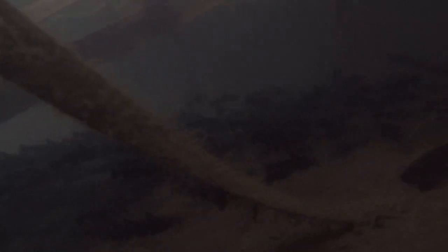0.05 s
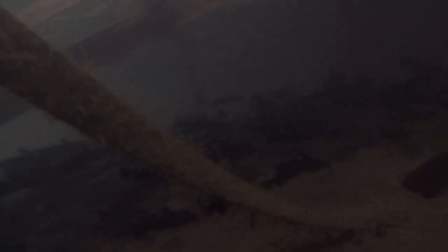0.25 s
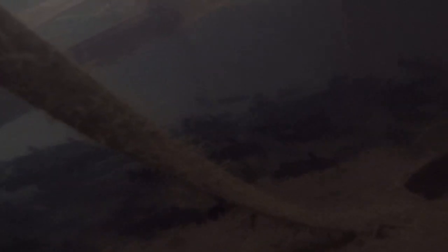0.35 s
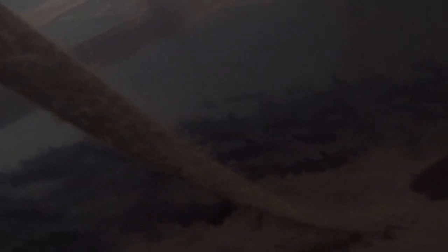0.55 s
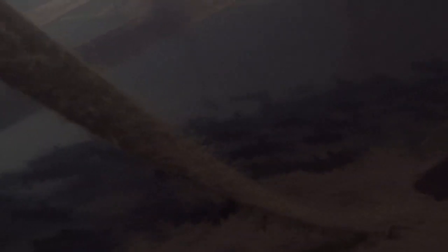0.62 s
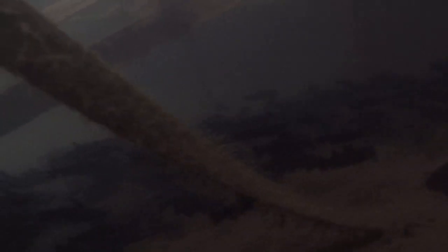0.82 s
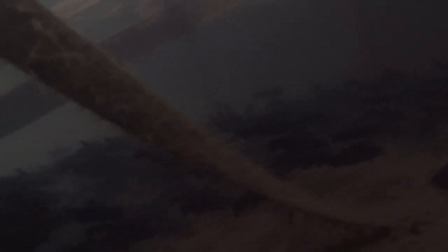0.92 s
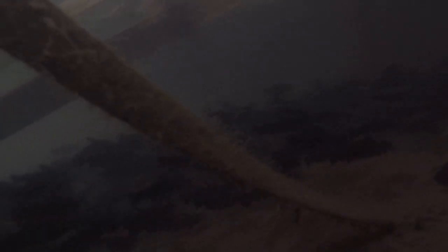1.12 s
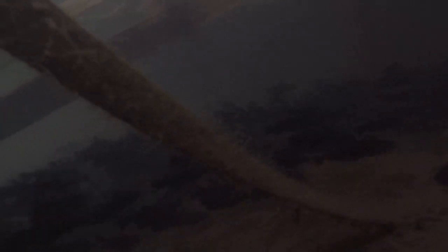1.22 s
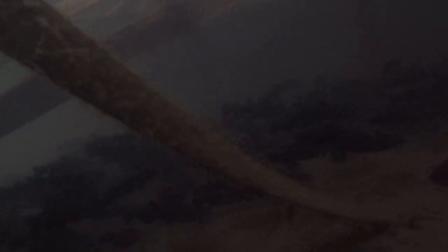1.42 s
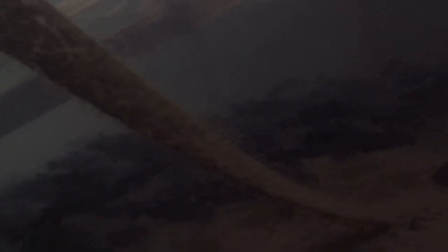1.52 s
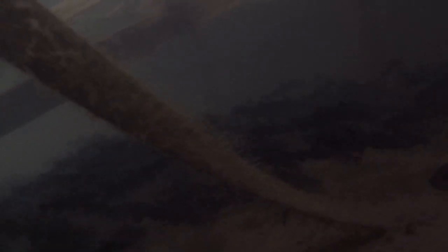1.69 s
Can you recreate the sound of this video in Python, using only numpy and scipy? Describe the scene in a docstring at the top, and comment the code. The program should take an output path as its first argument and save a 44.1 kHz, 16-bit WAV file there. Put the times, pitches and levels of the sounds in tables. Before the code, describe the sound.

Muffled knocks and soft bumps against a submerged camera, with water rumbling faintly underneath.

```python
"""Three knocks on a sealed camera housing in shallow water.
Each swells briefly, clacks in the housing's modes and leaves a low, water-damped ring.
Soft bumps and tiny scuffs come between. Under them: the rumble and wash of moving water,
a faint swish that rises in pitch, and microphone hiss."""
import sys
import numpy as np
from scipy import signal
from scipy.fft import rfft, irfft
from scipy.io import wavfile

SR = 44100
rng = np.random.default_rng(int(sys.argv[2]) if len(sys.argv) > 2 else 0)


def wrap_up_sound(samples):
    """Save the sound to the file named by the first command line argument, as 16-bit audio."""
    columns = np.atleast_2d(samples).T
    # keep every value between -1 and 1, then stretch to whole-number steps
    tamed = np.clip(columns, -1, 1)
    steps = np.round(tamed * 32767).astype(np.int16)
    wavfile.write(sys.argv[1], SR, steps)


N = 77175
T = np.arange(N) / SR
HZ = np.fft.rfftfreq(N, 1 / SR)

# water rumble and wash, envelopes (time [s], level [dB])
RUMBLE_LEVEL = [(0, -41), (.2, -39), (.45, -40.5), (.6, -38), (.8, -43.5), (.95, -36.5), (1.15, -38.5),
                (1.33, -35.5), (1.46, -35), (1.6, -32.5), (1.75, -33.5)]
WASH_LEVEL = [(0, -49), (.15, -48.5), (.27, -44.5), (.45, -46.5), (.65, -49), (.8, -49.5), (1.0, -50.5),
              (1.15, -46.5), (1.3, -49.5), (1.42, -48), (1.55, -48.5), (1.68, -49), (1.75, -46)]
# rumble, wash and microphone hiss, spectra (frequency [Hz], relative density [dB])
RUMBLE_SPECTRUM = [(10, -13.5), (30, 5.5), (60, -2), (100, -8), (150, -16.5), (220, -19), (400, -55),
                   (1000, -77)]
WASH_SPECTRUM = [(60, 3), (200, 0.5), (350, -3), (600, -6.5), (1100, -8), (1500, -15), (2200, -17),
                 (3200, -31), (6000, -52)]
HISS_SPECTRUM = [(1470, -53), (2500, -3.5), (2970, -5), (3780, -5), (5420, -8.5), (8190, -9.5),
                 (9450, -5.5), (10700, -9), (11500, -12.5), (13600, -16), (15000, -25)]
# pushes on the housing (time [s], level [dB], pitch [Hz], t60 [cycles])
SOFT_BUMPS = [(.088, -24.5, 42, 6), (0.264, -22, 90, 8.9), (0.2923, -19, 267, 14.7),
              (0.302, -14.5, 72, 8.7), (0.32, -16, 95.7, 13.2), (0.328, -20.5, 88, 4.7),
              (0.347, -13.5, 82, 3.4), (0.536, -27.5, 278, 17), (0.612, -26.5, 87, 3.2),
              (.888, -23, 91, 5.8), (0.996, -21.5, 93.3, 15), (1.018, -19.5, 124, 11),
              (1.035, -18, 68.5, 3.2), (1.051, -26, 133, 14), (1.104, -15.5, 134, 6),
              (1.135, -16.5, 111, 5.6), (1.215, -21.5, 92, 7.2), (1.3693, -14, 48, 9.4),
              (1.389, -11.5, 59.2, 3.9), (1.409, -17.5, 94, 9.8), (1.437, -24, 65.6, 15),
              (1.562, -18, 81, 5.8), (1.651, -19, 97, 6.4), (1.67, -18, 180, 4), (1.724, -22.5, 70, 3.4)]
# rubs on the housing (time [s], level [dB], centre [Hz], band sigma [octaves], time sigma [s])
GRITTY_SCUFFS = [(0.184, -40.5, 1180, 0.61, 0.0012), (0.185, -38, 333, 0.44, 0.0045),
                 (.198, -48, 1900, 0.41, 0.0029), (.2088, -32, 1790, 0.18, 0.00091),
                 (.209, -27.5, 470, 0.2, 0.0025), (0.217, -53.5, 7200, .1, 0.00098),
                 (0.216, -57, 4700, .28, 0.0011), (0.301, -38, 420, 0.31, 0.011),
                 (.412, -40.5, 338, 0.46, 0.009), (0.761, -38.5, 460, 0.31, 0.0041),
                 (1.064, -42, 1170, 0.53, 0.0047), (1.079, -42, 1450, 0.16, 0.0082),
                 (1.0737, -31.5, 1600, 0.27, 0.0015), (1.0755, -51.5, 3970, .22, 0.00074),
                 (1.14, -49, 980, .6, 0.0034), (1.365, -53, 1570, 0.6, .004),
                 (1.41, -48.5, 1060, 0.16, 0.022), (1.629, -48.5, 427, 0.32, 0.0066),
                 (1.675, -45.5, 325, 0.99, 0.013)]
# knocks (time [s], mode gain [dB], mode rise factor [ratio], thud level [dB], thud pitch [Hz],
# thud lag [s], swell pitch [Hz], swell level [dB], swell lead [s])
HARD_KNOCKS = [(0.2180, -5.5, 1.0, -12.5, 100.7, 0.0024, 225, -5.5, 0.0002),
               (1.0738, -7, 0.98, 2, 95.3, 0.0017, 506, -22, 0.0015),
               (1.3676, -9.5, 0.82, -2, 105.6, 0.004, 531, -20, 0.00033)]
# housing modes, struck at three spots
# (frequency [Hz], t60 [s], base rise [s], knock 1 gain [dB], knock 2 gain [dB], knock 3 gain [dB])
HOUSING_MODES = [(200.7, 0.065, 0.002, -0.5, -7, -3), (286.7, 0.12, 0.0045, -8.5, -56, -5.5),
                 (305.6, 0.0377, 0.0023, 6, -21, -5.5), (437, 0.031, 0.00079, -13.5, -0.5, -0.5),
                 (491, 0.096, 0.0031, -12.5, -30, -17.5), (544, 0.037, 0.0019, -17, -10, 1.5),
                 (595.6, 0.075, 0.0044, -5.5, -28, -36), (689.6, 0.044, 0.00078, -31, -7.5, -3.5),
                 (786, 0.037, 0.0016, -18.5, -10.5, -3), (863, 0.017, 0.0019, 0.5, 3, -3),
                 (914, 0.022, 0.0028, -1.5, 3, -16), (984, 0.034, 0.003, -13, -3.5, 0),
                 (1043, 0.028, 0.00094, -36, -9, -29)]
# water swish (time [s], pitch [Hz], level [dB])
SWISH_GLIDE = [(0.298, 290, -58), (0.448, 310, -49), (0.601, 345, -48), (0.751, 370, -48.5),
               (0.901, 440, -49), (1.02, 510, -49), (1.152, 570, -59), (1.451, 600, -52.5)]
# swish resonances (pitch multiple [ratio], half-width [Hz], gain [dB])
SWISH_RESONANCES = [(0.999, 32, -2.5), (1.3, 92, -3.5), (1.95, 200, -5.5)]


def amp(db):
    """Decibels to gain."""
    return 10 ** (np.asarray(db) / 20)


def add(mix, time_s, sound):
    """Mixes a sound in at time_s."""
    part = mix[max(round(time_s * SR), 0):][:len(sound)]
    part += sound[:len(part)]


def noise(gain):
    """Unit-RMS noise, shaped by a gain per frequency."""
    x = irfft(rfft(rng.standard_normal(N)) * gain, N)
    return x / np.sqrt(np.mean(x ** 2) + 1e-20)


def colour(points):
    """Gain per frequency from (frequency [Hz], level [dB])."""
    hz, db = np.transpose(points)
    return amp(np.interp(np.log(HZ + 1), np.log(hz + 1), db))


def level(points):
    """Gain per sample from (time [s], level [dB])."""
    return amp(np.interp(T, *np.transpose(points)))


def water():
    """Moving water: low rumble, soft wash."""
    rumble = level(RUMBLE_LEVEL) * noise(colour(RUMBLE_SPECTRUM))
    wash = level(WASH_LEVEL) * noise(colour(WASH_SPECTRUM))
    return rumble + wash


def ring(hz, rise_s, t60_s):
    """One damped mode, soft onset."""
    t = T[:N // 4]
    onset = 1 - np.exp(-(t / rise_s) ** 2)
    decay = np.exp(-np.log(1000) * t / t60_s)
    return onset * decay * np.sin(2 * np.pi * hz * t)


def bumps():
    """Soft pushes on the housing; each dies within a few cycles."""
    out = np.zeros(N)
    for time_s, db, hz, cycles in SOFT_BUMPS:
        add(out, time_s, amp(db) * ring(hz, rise_s=0.0024, t60_s=cycles / hz))
    return out


def scuffs():
    """Brief rubs on the housing; one puff of band noise each."""
    out = np.zeros(N)
    for time_s, db, hz, sigma_oct, sigma_s in GRITTY_SCUFFS:
        band = np.exp(-.5 * (np.log2((HZ + 1) / hz) / sigma_oct) ** 2)
        puff = np.exp(-.5 * ((T - time_s) / sigma_s) ** 2)
        out += amp(db) * puff * noise(band)
    return out


def swell(hz, peak_s, grow_s=0.0079, stop_s=0.0013):
    """A tone grows for a few cycles, then dies fast after peak_s."""
    t = T[:round(2 * peak_s * SR)] - peak_s
    envelope = np.exp(np.minimum(t / grow_s, -t / stop_s))
    return envelope * np.sin(2 * np.pi * hz * t)


def knocks(swell_peak_s=0.1):
    """Short swell, housing modes weighted by the spot struck, then a heavy thud."""
    out = np.zeros(N)
    for k, knock in enumerate(HARD_KNOCKS):
        time_s, db, softness, thud_db, thud_hz, lag_s, swell_hz, swell_db, lead_s = knock
        add(out, time_s - lead_s - swell_peak_s, amp(swell_db) * swell(swell_hz, swell_peak_s))
        for hz, t60_s, rise_s, *spot_db in HOUSING_MODES:
            add(out, time_s, amp(db + spot_db[k]) * ring(hz, rise_s * softness, t60_s))
        add(out, time_s + lag_s, amp(thud_db) * ring(thud_hz, rise_s=0.0039, t60_s=0.072))
    return out


def swish(fade_s=0.1):
    """Water swish: three noisy resonances glide up together."""
    time_s, hz, db = np.transpose(SWISH_GLIDE)
    phase_rad = 2 * np.pi * np.cumsum(np.interp(T, time_s, hz)) / SR
    inside_s = np.minimum(T - time_s[0], time_s[-1] - T)
    fade = np.clip(inside_s / fade_s + 1, 0, 1)
    bands = np.zeros(N)
    for multiple, half_width_hz, band_db in SWISH_RESONANCES:
        flutter = noise(1 / (1 + (HZ / half_width_hz) ** 2) ** 2)
        bands += amp(band_db) * flutter * np.sin(multiple * phase_rad)
    return fade * amp(np.interp(T, time_s, db)) * bands


def scene():
    """All sound reaching the microphone through the housing; mono."""
    return (bumps() + scuffs() + water() + knocks() + swish())[None]


def record(dry):
    """End fades, microphone hiss, low-pass."""
    fade_s, hiss_db, cutoff_hz = 0.003, -63, 15200
    fade = np.minimum(np.minimum(T, T[::-1]) / fade_s, 1)
    hiss = amp(hiss_db) * noise(colour(HISS_SPECTRUM))
    lowpass = signal.firwin(511, cutoff_hz, window=("kaiser", 9), fs=SR)
    return signal.oaconvolve(dry * fade + hiss, lowpass[None], "same")


dry = scene()
out = record(dry)
wrap_up_sound(out)
```